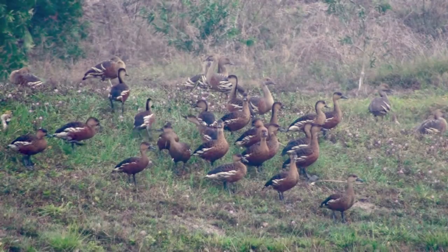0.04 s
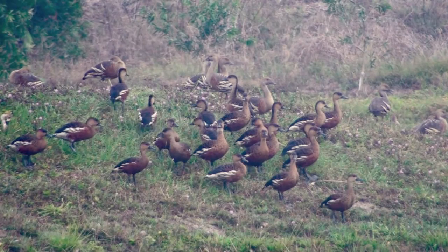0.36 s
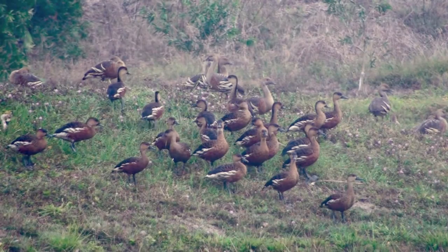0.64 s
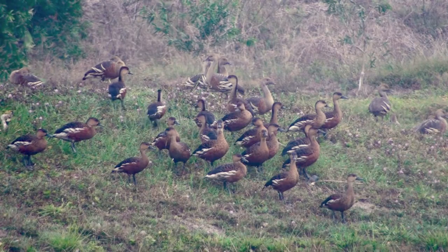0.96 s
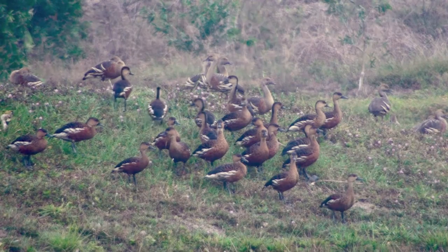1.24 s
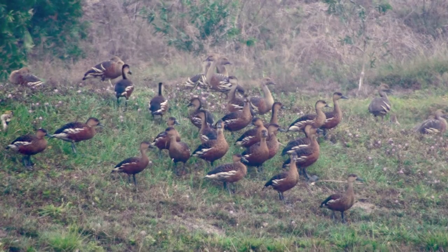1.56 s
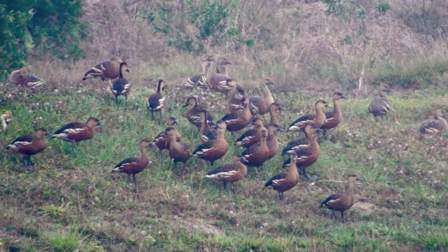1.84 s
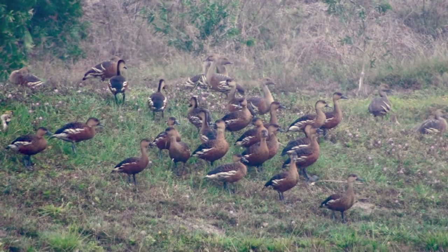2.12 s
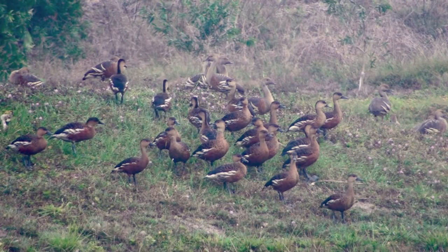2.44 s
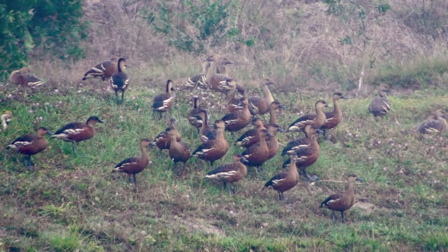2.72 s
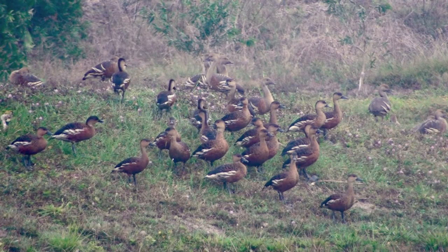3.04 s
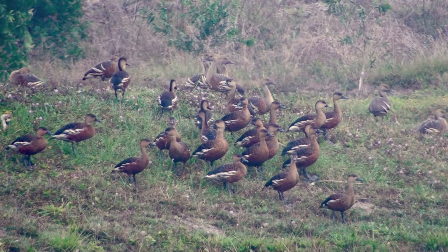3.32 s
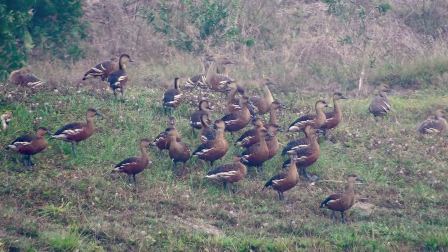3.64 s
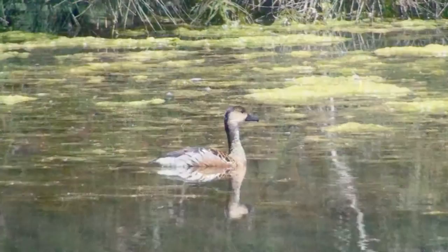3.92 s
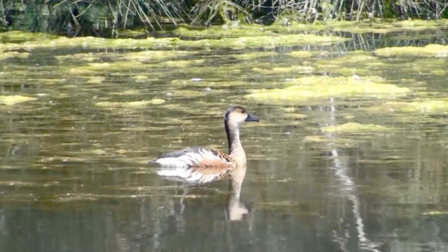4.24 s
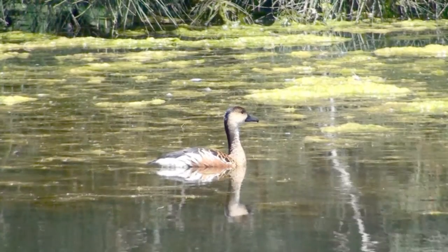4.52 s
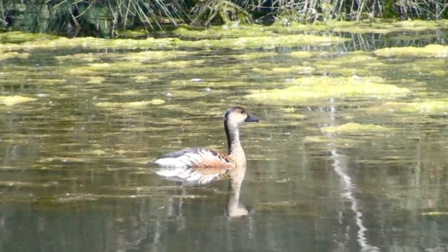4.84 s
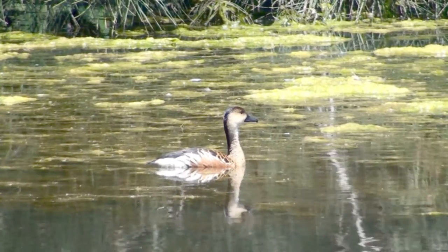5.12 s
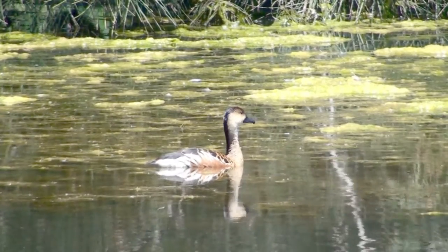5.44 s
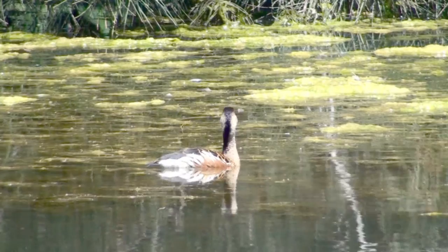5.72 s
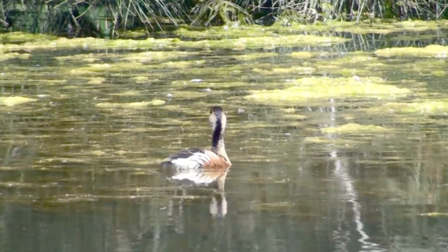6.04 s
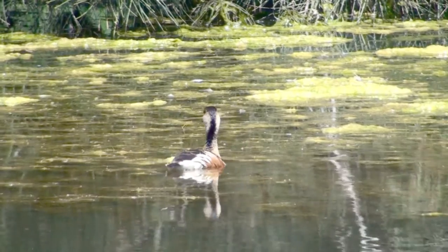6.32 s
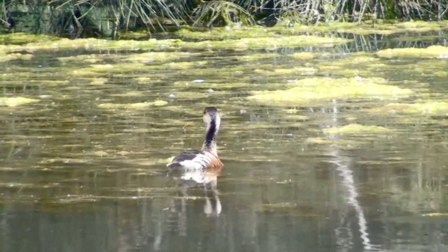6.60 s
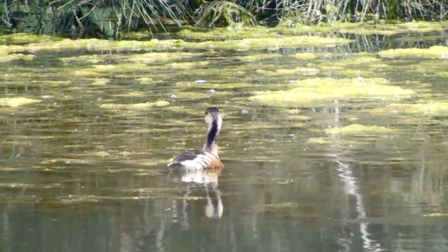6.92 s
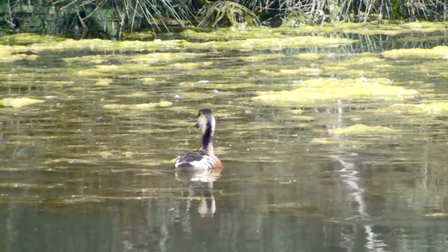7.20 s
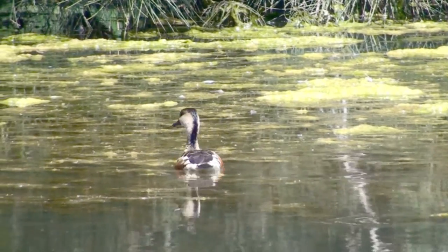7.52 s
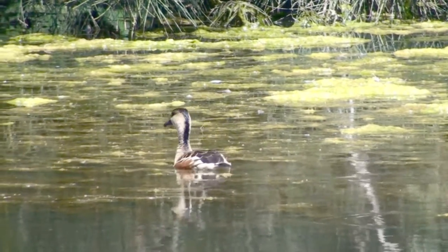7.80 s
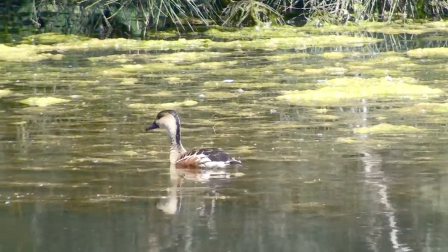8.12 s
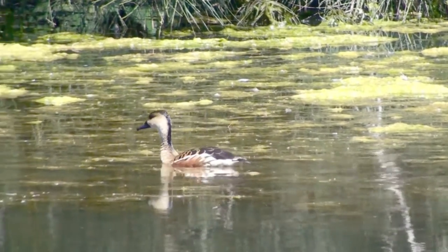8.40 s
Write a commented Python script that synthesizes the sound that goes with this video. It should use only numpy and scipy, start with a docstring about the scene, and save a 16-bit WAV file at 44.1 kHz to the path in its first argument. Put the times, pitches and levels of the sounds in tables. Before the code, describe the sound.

A flock of ducks whistles and peeps while harsh birds squawk, then softer whistled twittering continues on a quiet pond.

```python
"""Whistling ducks at a wetland. On the bank a flock peeps in near-pure gliding tones while far waterfowl
honk over a low rumble of air. Off to the right a harsh, reedy bird stutters out squawks; one duck gives
four rising wheeps, a second harsh bird answers from further off, and the first calls again. Near four
seconds the bank fades into a quiet pond, where many ducks twitter in thin whistles among small plops.
After six seconds come a light breeze and a few low knocks. Reeds and trees scatter the calls."""
import sys
import numpy as np
from scipy import signal
from scipy.fft import rfft, irfft, next_fast_len
from scipy.io import wavfile
from scipy.ndimage import uniform_filter1d

SR = 44100
rng = np.random.default_rng(int(sys.argv[2]) if len(sys.argv) > 2 else 0)


def unload_audio(sound):
    """Save the sound as a 16-bit wav file, at the path given as the first command line argument."""
    columns = np.transpose(np.atleast_2d(sound))
    # keep every value between -1 and 1, then stretch to whole-number steps
    steps = np.round(np.clip(columns, -1, 1) * 32767)
    wavfile.write(sys.argv[1], SR, steps.astype(np.int16))


N = 373086
TIME = np.arange(N) / SR


def near_squawker(direct_db=-2.7, ground_db=-22, trees_db=-18, hoarse_db=-23):
    """The harsh bird close by, with quick returns from the ground and a longer one from the trees."""
    # Each row: start in seconds, length in seconds, pitch in Hz, level in dB, strain from 0 to 1,
    # shrillness in dB, top-end gain in dB.
    syllables = [ (.637, 0.011, 1381, -23, 0.35, 6, -2), (0.651, 0.026, 1351, -16, 0.99, 8.5, -4),
                 (0.68, 0.019, 1356, -23, 0.99, -1, -16), (0.786, 0.018, 1376, -20, 0.28, 11.5, -3),
                 (0.807, 0.045, 1419, -17.5, 0.46, 13.5, -1), (0.91, 0.027, 1394, -21.5, 0.29, 11.5, -11),
                 (.945, 0.015, 1423, -20, 0.26, 13.5, -3), (0.967, 0.029, 1307, -13.5, 0.95, 4.5, -2.5),
                 (2.649, 0.015, 1369, -19, 0.2, -4, -14), (2.665, 0.031, 1327, -12.5, 0.76, 0, -16.5),
                 (2.785, 0.023, 1385, -17.5, .2, -9, -25.5), (2.812, .011, 1285, -11.5, 0.73, -2, -26.5),
                 (2.826, 0.013, 1409, -14, .22, -6.5, -25), (2.836, 0.022, 1276, -13.5, 0.93, -0.5, -27),
                 (2.959, 0.037, 1348, -21.5, .15, -8.5, -27), (3.002, .012, 1353, -19, 0.19, -7, -22),
                 (3.027, .011, 1412, -15.5, 0, -8, -14), (3.045, 0.026, 1287, -12.5, .85, -5, -13)]
    dry = np.zeros(N)
    for *note, strain, shrill_db, top_db in syllables:
        start, voice = squawk(*note, strain, shrill_db, top_db, jitter=.02, rasp=.12, rasp_hz=570)
        hoarse = gain_of(hoarse_db + shrill_db / 2) * (1 - strain)  # slack, shrill notes turn breathy
        add(dry, start, voice * (1 + hoarse * waver(len(voice), rate_hz=1400)))
    ground = gain_of(ground_db) * outdoors(dry, build_s=.024, decay_scale=.3)
    trees = gain_of(trees_db) * outdoors(dry, build_s=.041, decay_scale=.42)
    return caller_pan() * (gain_of(direct_db) * dry + ground + trees)


def far_squawker(direct_db=-2, wet_db=-11, top_db=-15):
    """A second harsh bird answers from further off, blurred by the scrub."""
    # Each row: start in seconds, length in seconds, pitch in Hz, level in dB, strain from 0 to 1,
    # shrillness in dB.
    syllables = [ (1.438, 0.036, 1367, -34.5, 0.48, 15.5), (1.641, 0.018, 1392, -38.5, .4, 21),
                 (1.671, 0.035, 1392, -29, 0.34, 12), (1.794, 0.023, 1348, -33.5, .4, 17.5),
                 (1.831, 0.011, 1363, -30.5, .5, 14), (1.857, 0.03, 1346, -28.5, 0.56, 18),
                 (1.971, 0.024, 1251, -38.5, 0.34, 2.5), (3.654, 0.041, 1354, -38.5, 0.48, 16.5),
                 (3.869, 0.058, 1375, -41, 0.43, 14), (4.019, 0.034, 1331, -50, 0.44, 20),
                 (4.071, 0.043, 1359, -48.5, 0.41, 13)]
    dry = np.zeros(N)
    for *note, shrill_db in syllables:
        start, voice = squawk(*note, shrill_db, top_db + shrill_db, jitter=.015, rasp=.27, rasp_hz=254,
                              shrill_hz=6760, shrill_width_hz=1130)
        add(dry, start, bounced(voice, share=.98, spread_s=.014))
    wet = gain_of(wet_db) * outdoors(dry, build_s=.008, decay_scale=.68)
    return caller_pan() * (gain_of(direct_db) * dry + wet)


def squawk(s, length, pitch_hz, db, strain, shrill_db, top_db, jitter, rasp, rasp_hz,
           shrill_hz=7400, shrill_width_hz=1400, dulling=.45, arch=.008, scoop=.07, scoop_s=.0028):
    """A reedy harmonic voice: strain moves its weight from the second harmonic to the higher ones."""
    # The throat's tone, slack and strained. Each row: frequency in Hz, gain in dB.
    slack_throat = [(1350, -29), (2000, 1.5), (2800, 1.5), (4100, -10), (5400, -26), (6900, -22.5),
                    (8300, -33), (9600, -67.5), (12000, -38), (15000, -62)]
    strained_throat = [(1300, -37.5), (2600, -20.5), (3900, -1), (5200, 2.5), (6500, -22.5), (7800, -37.5),
                       (9100, -1.5), (10400, -25), (11800, -35.5), (14800, -36), (16000, -45)]
    slack = 1 - strain
    crest = .79 * slack + .25 * strain  # slack notes peak late, strained ones early
    rise = .07 * slack - .018 * strain  # slack notes climb, strained ones sag
    start, along, level = swell(s, length, db, crest, ends_db=-14, fullness=4.4,
                                edge_s=.002, release_s=.0022)
    hz = pitch_hz * glide(along, 1 - rise / 2 - arch, 1, 1 + rise / 2 - arch)
    hz *= 1 - scoop * slack * np.exp(-along * length / scoop_s)
    loose = 1 - .95 * strain  # a slack membrane beats less evenly
    phase = 2 * np.pi * np.cumsum(hz * (1 + jitter * loose * waver(len(hz), rate_hz=230))) / SR
    harmonic_hz = np.arange(1, 13)[:, None] * hz
    throat_db = slack * read(slack_throat, harmonic_hz) + strain * read(strained_throat, harmonic_hz)
    throat_db += shrill_db * np.exp(-((harmonic_hz - shrill_hz) / shrill_width_hz) ** 2)
    throat_db += top_db * np.clip((harmonic_hz - 10300) / 1500, 0, 1)
    # The top dies first as pressure drops.
    easing_db = np.maximum(20 * np.log10(level / level.max() + 1e-9), -25)
    throat_db += dulling * easing_db * np.clip((harmonic_hz - 4000) / 5000, 0, 2)
    weights = gain_of(throat_db)
    weights *= np.sqrt(2 / (weights ** 2).sum(0))
    voice = sum(weight * (1 + rasp * loose * waver(len(hz), rasp_hz)) * np.sin(k * phase)
                for k, weight in enumerate(weights, 1))
    return start, level * voice


def bank_ducks(direct_db=-1.5, wet_db=-12, far_db=-2):
    """The flock whistles and peeps on the grass, busiest in the first two seconds."""
    # Each row: start in seconds, length in seconds, start, middle and end pitch in Hz, level in dB,
    # loudest point from 0 to 1.
    glides = [(0.101, 0.04, 5590, 4690, 4620, -45, 0.1), (0.118, 0.099, 2380, 2680, 2480, -40, 0.62),
              (0.148, 0.04, 5400, 5450, 5260, -55, 0.3), (0.249, 0.027, 3960, 4460, 4130, -46.5, 0.75),
              (0.337, 0.048, 5260, 5510, 4290, -58.5, 0.08), (0.485, 0.014, 4340, 4120, 3640, -34.5, 0.2),
              (0.689, 0.055, 4980, 4760, 4430, -27.5, 0.07), (0.862, 0.02, 5240, 5340, 4840, -28.5, 0.2),
              (0.983, 0.086, 5230, 4700, 3840, -36.5, 0.07), (1.225, 0.05, 4950, 4600, 4280, -51, 0.4),
              (1.31, 0.08, 5400, 5650, 4910, -53.5, 0.5), (1.435, 0.045, 3900, 3750, 3470, -36.5, 0.42),
              (1.506, 0.027, 5920, 5260, 5010, -38.5, 0.07), (1.585, 0.035, 4600, 4480, 4420, -35.5, 0.46),
              (2.085, 0.07, 2900, 3400, 2780, -56, 0.3), (2.249, 0.045, 4620, 4940, 5800, -46, 0.23),
              (2.28, 0.028, 5930, 5460, 4920, -45.0, 0.08), (2.335, 0.045, 4450, 5000, 4470, -50.5, 0.5),
              (2.392, 0.031, 4480, 5180, 5030, -42.5, 0.85), (2.466, 0.039, 4480, 4340, 4020, -48.5, 0.18),
              (3.395, 0.06, 3600, 4350, 4100, -60.5, 0.46), (3.567, 0.05, 3500, 3840, 3730, -51, 0.15),
              (4.102, 0.017, 5060, 3560, 3570, -39, 0.37)]
    # Each row: start in seconds, length in seconds, pitch in Hz, slide as a share of pitch, level in dB.
    short_peeps = [(0.441, 0.016, 5620, -0.033, -35), (0.466, 0.016, 6100, -0.066, -30.5),
                   (0.497, 0.016, 5720, 0.0, -32.5), (1.278, 0.021, 5100.0, 0.032, -37),
                   (1.507, 0.016, 4350.0, 0.02, -34), (2.165, 0.028, 4780, 0.018, -54),
                   (2.438, 0.037, 5350, 0.047, -45.5), (3.287, 0.0093, 6160, 0.012, -57),
                   (3.506, 0.0093, 5200, -0.088, -52.5), (3.635, 0.036, 4230.0, -0.01, -43.5),
                   (3.795, 0.028, 4314, 0.0013, -46), (3.902, 0.063, 5250, 0.0083, -48.5)]
    near = whistles(glides + peeps(short_peeps), jitter=.011, flutter=.48, octave_db=-34.5, bounce=.35)
    far = far_flock(-.05, 3.4, count=50, pitch_hz=4200, level_db=-53.5)
    far += far_flock(-.068, 2.15, count=32, pitch_hz=2900, level_db=-54.5)
    wet = gain_of(wet_db) * outdoors(near + far, build_s=.017, decay_scale=.39)
    return caller_pan() * (gain_of(direct_db) * near + gain_of(far_db) * far + wet)


def wheeping_duck(direct_db=-4, wet_db=-9, halfway_climb=.38, crest=.17, flick_s=.0095, flick_db=-3):
    """One duck at the back: each whistle climbs ever faster to a flick, broken up by the scrub."""
    # Each row: start in seconds, length in seconds, start and top pitch in Hz, level in dB.
    wheeps = [(1.252, 0.038, 2290, 4127, -25.5), (1.36, .031, 2850, 4610, -27.5),
              (1.45, .035, 2620, 4530, -28), (1.566, .031, 2650, 4566, -24.5)]
    climbs = [(s, length, low, low + halfway_climb * (top - low), top, db, crest)
              for s, length, low, top, db in wheeps]
    flicks = [(s + length - flick_s / 2, flick_s, top, 0, db + flick_db)
              for s, length, _, top, db in wheeps]
    dry = whistles(climbs + peeps(flicks), jitter=.016, flutter=.4, octave_db=-41.5, bounce=.61)
    wet = gain_of(wet_db) * outdoors(dry, build_s=.004, decay_scale=.4)
    return caller_pan() * (gain_of(direct_db) * dry + wet)


def pond_ducks(wet_db=-17, far_db=-1):
    """Ducks on open water, the reeds answering faintly; far ones join in as the chorus grows."""
    # Each row: start in seconds, length in seconds, start, middle and end pitch in Hz, level in dB,
    # loudest point from 0 to 1.
    glides = [(4.192, 0.049, 4360, 5080, 5120, -63, 0.88), (4.216, 0.05, 3580, 4720, 4500, -54.5, 0.15),
              (4.268, 0.026, 4510, 4260, 4560, -46, 0.56), (4.29, 0.075, 4060, 3520, 2830, -63, 0.13),
              (4.325, 0.029, 4060, 4400, 4880, -50.5, 0.13), (4.364, 0.12, 4680, 4384, 3640, -43.0, 0.53),
              (4.524, 0.027, 3874, 4040, 4070, -50.5, 0.47), (4.587, 0.036, 3980, 3720, 3140, -59.5, 0),
              (4.8, 0.048, 3460, 4200, 3560, -54.5, 0.35), (4.915, 0.017, 5040, 4125, 2680, -67.5, 0.8),
              (4.954, 0.038, 3520, 3790, 3800, -51, 0.88), (5.006, 0.044, 3030, 3800, 3900, -59, 0.78),
              (5.064, 0.081, 4150, 3250, 2400, -54.5, 0.15), (5.117, 0.026, 5550, 5090, 4300, -47.5, 0.43),
              (5.205, 0.055, 5220, 4930, 5270, -54, 0.46), (5.268, 0.074, 3570, 3140, 2270, -56.5, 0.01),
              (5.285, 0.017, 5460, 5470, 4890, -45, 0.5), (5.531, 0.049, 4790, 4750, 4950, -38.5, 0.83),
              (5.559, 0.094, 4676, 5032, 4240, -36.0, 0.28), (5.649, 0.054, 4170, 3840, 3530, -51.5, 0),
              (5.71, 0.03, 3980, 3640, 2360, -51.5, 0.08), (5.75, 0.015, 2480, 3480, 4400, -55.5, 0.5),
              (5.832, 0.042, 3870, 4880, 4923, -34.5, 0.87), (5.841, 0.053, 3570, 4480, 4570, -37, 0.25),
              (5.888, 0.039, 4060, 4100, 3410, -32.5, 0.07), (5.93, 0.053, 3450, 2980, 2190, -48.5, 0.1),
              (5.964, 0.054, 3960, 4610, 3860, -40.5, 0), (6.027, 0.033, 3610, 4060, 3530, -46, 0.01),
              (6.096, 0.034, 3330, 4820, 3340, -60, 0.62), (6.108, 0.043, 2900, 3475, 3236, -58.5, 0.6),
              (6.135, 0.045, 3500, 4640, 3700, -61, 0.48), (6.256, 0.07, 3470, 4204, 3780, -51, 0.47),
              (6.321, 0.11, 3560, 3810, 3520, -52.5, 0.55), (6.462, 0.031, 3760, 4590, 5300, -54.5, 0.53),
              (6.503, 0.032, 5090, 4950, 5280, -47.5, 0.2), (6.541, 0.052, 5380, 5420, 6000, -51, 0.47),
              (6.627, 0.09, 5600, 5140, 4950, -45, 0.93), (6.701, 0.09, 5030, 4430, 4550, -48.5, 0.06),
              (6.852, 0.058, 4445, 4480, 3595, -47.0, 0), (6.963, 0.11, 4150, 5190, 5200, -50.5, 0.4),
              (7.061, 0.068, 4815, 4455, 3890, -40, 0), (7.401, 0.037, 3270, 4420, 3790, -48, 0.03),
              (7.436, 0.14, 4500, 4850, 4530, -56, 0.86), (7.55, 0.051, 4560, 4060, 3710, -43, 0.87),
              (7.603, 0.034, 3500, 3280, 2880, -39.5, 0.08), (7.615, 0.133, 3630, 4050, 3140, -56.5, 0.95),
              (7.64, 0.078, 2900, 1960, 1140, -72, 0), (7.666, 0.12, 3660, 2570, 1430, -64.5, 0),
              (7.935, 0.045, 4500, 4530, 4960, -62.5, 0.8), (8.004, 0.09, 5200, 4890, 4340, -59, 0.92),
              (8.008, 0.16, 3500, 3716, 3230, -50, 0.36), (8.112, 0.16, 5500, 5660, 5570, -62, 0.02),
              (8.123, 0.11, 5000, 4200, 3260, -64, 0.1), (8.235, 0.035, 4100, 3650, 2950, -64, 0.7)]
    # Each row: start in seconds, length in seconds, pitch in Hz, slide as a share of pitch, level in dB.
    short_peeps = [(4.543, 0.042, 4905, 0.022, -45.8), (4.692, 0.028, 5700, -0.0013, -57.5),
                   (4.975, 0.014, 4550, 0.0051, -43.5), (5.39, 0.032, 4385, 0.01, -47),
                   (5.456, 0.022, 4010, 0.013, -48.5), (5.645, 0.018, 2006, -0.0029, -59.5),
                   (5.662, 0.056, 2607, 0.05, -54), (5.942, 0.026, 4300, -0.035, -44.9),
                   (7.314, 0.028, 2628, -0.0017, -53.5), (7.348, 0.012, 3570, -0.015, -36),
                   (7.36, 0.013, 3850.0, -0.057, -40), (7.431, 0.015, 3555, -0.028, -44),
                   (7.461, 0.021, 3370, 0.0072, -48.5), (7.526, 0.029, 3400, -0.0073, -49.5),
                   (7.537, 0.013, 2876, 0.08, -60), (7.825, 0.019, 4440.0, 0.01, -64.5),
                   (7.91, 0.019, 3400.0, 0.01, -58), (8.057, 0.028, 5960, -0.013, -54),
                   (8.117, 0.02, 3620.0, -0.023, -49.5), (8.252, 0.015, 2232, -0.015, -50),
                   (8.417, 0.016, 3396, 0.00068, -49.5)]
    near = whistles(glides + peeps(short_peeps), jitter=.006, flutter=.18, octave_db=-29.5, bounce=.23)
    far = far_flock(4.2, 6.1, count=20, pitch_hz=4500, level_db=-70)
    far += far_flock(5.62, 8.3, count=80, pitch_hz=4750, level_db=-63.5)
    far += far_flock(5.2, 8.7, count=26, pitch_hz=3860, level_db=-66)
    wet = gain_of(wet_db) * outdoors(near + 3 * far, build_s=.0054, decay_scale=.5)
    return caller_pan() * (near + gain_of(far_db) * far + wet)


def whistles(notes, jitter, flutter, octave_db, bounce):
    """Trembling, near-pure glides, each by its own path; the octave shows when a note is forced."""
    dry = np.zeros(N)
    for s, length, start_hz, middle_hz, end_hz, db, crest in notes:
        start, along, level = swell(s, length, db, crest, ends_db=-11.5, fullness=2.01,
                                    edge_s=.0037, release_s=.0024)
        hz = glide(along, start_hz, middle_hz, end_hz)
        phase = 2 * np.pi * np.cumsum(hz * (1 + jitter * waver(len(hz), rate_hz=88))) / SR
        octave = gain_of(octave_db) * np.sqrt(level / level.max()) / (1 + (hz / 4150) ** 10)
        level *= 1 + flutter * waver(len(hz), rate_hz=41)
        tone = np.sqrt(2) * level * (np.sin(phase) + octave * np.sin(2 * phase))
        add(dry, start, bounced(tone, bounce, spread_s=.016))
    return dry


def peeps(rows, arch=.04):
    """Whistle notes that share one pitch arch, tilted by their slide and loudest in the middle."""
    return [(s, length, hz * (1 - arch - slide), hz, hz * (1 - arch + slide), db, .5)
            for s, length, hz, slide, db in rows]


def twitter(wet_db=-9, chirps=18, max_fall=.28):
    """Excited bursts among the whistles, each a swarm of tiny falling chirps around one pitch."""
    # Each row: start in seconds, length in seconds, pitch in Hz, level in dB.
    bursts = [(0.455, 0.03, 6440, -40), (0.851, 0.056, 4830, -38), (0.86, 0.042, 3045, -39.5),
              (4.988, 0.13, 3300, -63), (5.098, 0.091, 3220, -68), (5.647, 0.12, 3550, -67),
              (5.643, 0.09, 1667, -76), (5.722, 0.12, 3690, -64), (7.397, 0.05, 3690, -61),
              (7.384, 0.11, 1840, -75)]
    dry, along = np.zeros(N), np.linspace(0, 1, SR // 64)
    for s, length, hz, db in bursts:
        swarm = np.zeros(round((length + .02) * SR))
        for k, (when, high, fall) in enumerate(rng.random((chirps, 3))):
            pitch = hz * (.8 + .42 * high) * (1 - max_fall * fall * along)
            chirp = np.hanning(len(along)) * np.sin(2 * np.pi * np.cumsum(pitch) / SR)
            add(swarm, length * (k + when) / chirps, chirp)
        add(dry, s - .006, gain_of(db) * unit_rms(swarm))
    return caller_pan() * (dry + gain_of(wet_db) * outdoors(dry, build_s=.01, decay_scale=.63))


def far_honks(lean_db=-10, direct_db=-2, wet_db=-8):
    """Distant waterfowl: only each honk's strongest partial carries, over a gabble of fainter ones."""
    # Each row: start in seconds, length in seconds, pitch in Hz, slide as a share of pitch, level in dB.
    honks = [(.2, .13, 1125, .025, -57), (.38, 0.065, 1036, -0.073, -52.5),
             (.52, 0.15, 739.5, -0.015, -53.5), (1.0, 0.26, 685, -0.11, -56.5),
             (1.04, 0.056, 907, 0.0043, -39.5), (1.1, 0.26, 1082, -0.049, -54),
             (1.255, 0.042, 925, 0.038, -44), (1.565, 0.066, 957.4, 0.024, -34.5),
             (1.6, 0.35, 1073, -0.047, -50), (1.73, .1, 672, -0.084, -54.5),
             (1.765, .036, 947, .025, -36.5), (1.89, 0.095, 1221, 0.031, -55.5),
             (2.79, 0.079, 914, -0.024, -43.5), (3.0, 0.087, 932, 0.072, -52),
             (3.18, 0.23, 1084, 0.013, -56)]
    dry = whistles(peeps(honks, arch=.013), jitter=.007, flutter=.25, octave_db=-28.5, bounce=.25)
    dry += far_flock(-.027, 3.5, count=40, pitch_hz=1067, level_db=-56)
    wet = gain_of(wet_db) * outdoors(dry, build_s=.011, decay_scale=.59)
    return pan(lean_db)[:, None] * (gain_of(direct_db) * dry + wet)


def far_flock(from_s, to_s, count, pitch_hz, level_db, crest=.33):
    """Birds further off: wavering, arched notes at random moments."""
    notes = []
    for k, (when, long, high, faint, fall, climb) in enumerate(rng.random((count, 6))):
        s = from_s + (to_s - from_s) * (k + when) / count
        length = .022 + .08 * long
        hz = pitch_hz * (.7 + .48 * high)
        arc_hz = hz * (.97 - .2 * climb), hz * .97, hz * (.95 - .22 * fall)
        notes.append((s, length, *arc_hz, level_db - 9 * faint, crest))
    return whistles(notes, jitter=.014, flutter=.35, octave_db=-30, bounce=1)


def pond_plops_and_knocks(wet_db=-12, attack_s=.00085):
    """Small plops, a few low knocks and a soft thump at the pond, all quickly dying tones."""
    # Each row: start in seconds, pitch in Hz, level in dB, seconds to die away by 60 dB.
    plops_and_knocks = [(4.246, 1877, -57, 0.057), (4.36, 1660, -71, 0.069), (4.483, 1420, -70.5, .09),
                        (4.882, 1627, -75.5, 0.086), (6.288, 258, -72.5, 0.079), (6.292, 478, -82.5, 0.083),
                        (6.84, 1616, -66, 0.047), (6.893, 250, -75, .12), (6.895, 494, -70, 0.049),
                        (7.204, 1697, -58.5, 0.051), (7.206, 2500, -67.5, 0.039), (7.86, 155, -80.5, 0.19),
                        (8.016, 1674, -64, 0.045)]
    dry, t = np.zeros(N), np.arange(SR // 4) / SR
    for s, hz, db, t60 in plops_and_knocks:
        envelope = 2 * gain_of(db - 60 * t / t60) * (1 - np.exp(-t / attack_s))
        add(dry, s, envelope * np.sin(2 * np.pi * hz * t))
    return dry + gain_of(wet_db) * outdoors(dry, build_s=.01, decay_scale=.57)


def air_beds(bank_db=-57.5, pond_db=-77.5, pond_in_s=3.93, fade_in_s=.5):
    """The rumble and hiss of the bank give way to the hush of the pond and a light breeze."""
    # The tone of each bed. Each row: frequency in Hz, relative level in dB.
    bank_colour = [(12, -29.5), (20, -1.5), (118, -3), (256, -23.5), (713, -10), (1050, -11), (2040, -23),
                   (2620, -14.5), (3180, -28), (5090, -19), (6360, -34), (7510, -44.5), (8380, -28.5),
                   (9370, -61.5), (15000, -62.5)]
    pond_colour = [(20, 12), (50, -15.5), (100, -39), (200, -18), (500, -5.5), (1000, 0), (2000, -10),
                   (3000, -12), (4400, -4), (6300, -14.5), (8000, -38), (15000, -35.5)]
    breeze_colour = [(10, 9), (30, -4), (60, -17.5), (120, -36.5), (250, -46), (1000, -82)]
    # Stereo balance. Each row: frequency in Hz, left minus right in dB.
    bank_lean = [(60, -21.5), (120, -25.5), (200, -13), (380, 2.5), (700, -2), (1300, -3.5), (2400, -6.5),
                 (8000, -16.5), (15000, 1)]
    centred = [(20, 0), (15000, 0)]
    # Fader moves. Each row: time in seconds, gain in dB.
    bank_fade = [(0, 2.5), (2.1, 0), (3.5, -2.5), (3.8, -2), (4.0, -8), (4.12, -16), (4.2, -56)]
    breeze_fade = [(4, -92), (4.5, -102), (6.25, -86), (6.36, -64), (7.0, -72), (7.45, -68.5), (8, -69),
                   (8.46, -78)]
    bank = gain_of(bank_db + ride(bank_fade)) * air(bank_colour, bank_lean, shared=.16, patchy_db=1)
    pond = gain_of(pond_db) * air(pond_colour, centred, shared=.2, patchy_db=4.5)
    breeze = gain_of(ride(breeze_fade)) * air(breeze_colour, centred, shared=1, patchy_db=-3)
    return bank + (pond + breeze) * np.interp(TIME, [pond_in_s - fade_in_s, pond_in_s], [0, 1])


def air(colour, lean, shared, patchy_db):
    """Coloured noise in drifting patches; `shared` sets how alike the two ears are."""
    frames, hz = N // 512 + 5, np.fft.rfftfreq(2048, 1 / SR)
    noise = rng.standard_normal((frames, len(hz), 5)).T
    left = noise[0] + 1j * noise[1]
    right = shared * left + np.sqrt(1 - shared ** 2) * (noise[2] + 1j * noise[3])
    patches = unit_rms(uniform_filter1d(uniform_filter1d(noise[4], size=9, axis=0), size=9, axis=1))
    shape = gain_of(read(colour, hz)[:, None] + patchy_db * patches)
    spectra = np.array([left, right]) * shape * pan(read(lean, hz))[:, :, None]
    bed = signal.istft(spectra, nperseg=2048, noverlap=1536)[1][:, :N]
    return bed / np.std(bed.mean(0))


def bounced(x, share, spread_s):
    """Eight quick bounces off ground and water: a gliding note flutters through their comb."""
    delay, sign = rng.random((2, 8))
    taps = np.zeros(SR // 20)
    taps[(spread_s * (.1 + delay) * SR).astype(int)] = np.sign(sign - .5) * share / np.sqrt(8)
    taps[0] = 1
    return signal.fftconvolve(x, taps) / np.sqrt(1 + share ** 2)


def outdoors(x, build_s, decay_scale):
    """Scatter from reeds and trees: sparse taps, treble dying first, unrelated in each ear."""
    # Each row: frequency in Hz, seconds to die away by 60 dB before decay_scale shortens it.
    echo_t60 = [(500, 1), (3000, 0.81), (6000, 0.97), (10000, 0.47), (15000, 0.6)]
    taps = np.zeros((2, SR))
    slots = np.arange(0, SR - 12, 12)
    arrivals = slots + rng.integers(0, 12, (2, len(slots)))
    np.put_along_axis(taps, arrivals, rng.choice([-1., 1.], arrivals.shape), 1)
    hz, t, spectra = signal.stft(taps, SR, nperseg=256)
    envelope = gain_of(-60 * t / (decay_scale * read(echo_t60, hz)[:, None])) * np.minimum(t / build_s, 1)
    tail = signal.istft(spectra * envelope, SR, nperseg=256)[1]
    return signal.fftconvolve(x[None], tail / np.linalg.norm(tail[0]), axes=1)[:, :N]


def caller_pan():
    """Panning that follows the callers: well to the right on the bank, near centre on the pond."""
    # Each row: time in seconds, left minus right in dB.
    caller_side = [(.3, -18), (.46, -24), (.7, -15.5), (1.8, -18), (2.2, -11), (3.2, -10.5), (3.7, -16.5),
                   (4.1, -20), (4.2, -3), (6.1, -.5), (6.6, -3.5), (7.1, -4.5), (7.6, -0.5), (8.1, -3.8)]
    return pan(ride(caller_side))


def swell(s, length, db, crest, ends_db, fullness, edge_s, release_s):
    """Start, progress 0-1 and amplitude of a note that swells to its crest, eases off and dies."""
    t = np.arange(-edge_s, length + 2 * np.pi * release_s, 1 / SR)
    along, crest = np.clip(t / length, 0, 1), np.clip(crest, .05, .95)
    from_crest = np.maximum((crest - along) / crest, (along - crest) / (1 - crest))
    attack = np.sin(np.pi / 2 * np.minimum(t / edge_s + 1, 1)) ** 2
    release = np.exp(-np.maximum(t - length, 0) / release_s)
    return s - edge_s, along, attack * release * gain_of(db + ends_db * from_crest ** fullness)


def glide(along, start, middle, end):
    """One smooth arc through three pitches."""
    return start + (end - start) * along + (2 * middle - start - end) * 2 * along * (1 - along)


def waver(size, rate_hz):
    """A smooth random wobble of rms about 1, rolling off above the rate."""
    length = next_fast_len(size + 8192)
    hz = np.fft.rfftfreq(length, 1 / SR)
    return unit_rms(irfft(rfft(rng.standard_normal(length)) / (1 + (hz / rate_hz) ** 4), length))[:size]


def pan(lean_db):
    """Left and right gains whose mean is 1; a positive lean is to the left."""
    ratio = gain_of(lean_db)
    return np.array([2 * ratio / (1 + ratio), 2 / (1 + ratio)])


def ride(points):
    """An automation curve over the whole scene."""
    return np.interp(TIME, *np.transpose(points))


def read(points, hz):
    """Reads a curve on a log-frequency axis."""
    point_hz, value = np.transpose(points)
    return np.interp(np.log(hz + 1), np.log(point_hz + 1), value)


def add(mix, s, sound):
    """Drops a sound into the mix at s seconds."""
    part = mix[..., max(round(s * SR), 0):][..., :sound.shape[-1]]
    part += sound[..., :part.shape[-1]]


def gain_of(db):
    """Decibels to amplitude."""
    return 10 ** (np.asarray(db) / 20)


def unit_rms(x):
    """Scales to rms 1."""
    return x / np.sqrt(np.mean(x ** 2) + 1e-20)


def scene():
    """The birds, the pond and the air around them."""
    birds = near_squawker() + far_squawker() + bank_ducks() + wheeping_duck() + pond_ducks() + twitter()
    return birds + far_honks() + pond_plops_and_knocks() + air_beds()


def record(dry, cutoff_hz=15700):
    """A steep low-pass trims the very top of the mix."""
    lowpass = signal.firwin(511, cutoff_hz, window=("kaiser", 9), fs=SR)
    return signal.oaconvolve(dry, lowpass[None], "same")


dry = scene()
out = record(dry)
unload_audio(out)
```